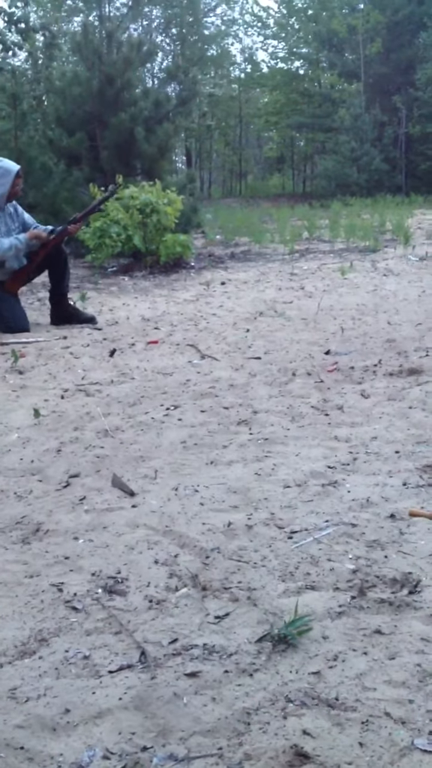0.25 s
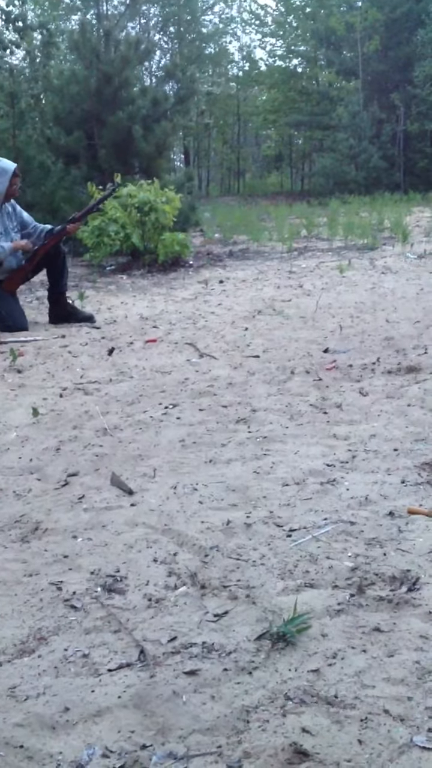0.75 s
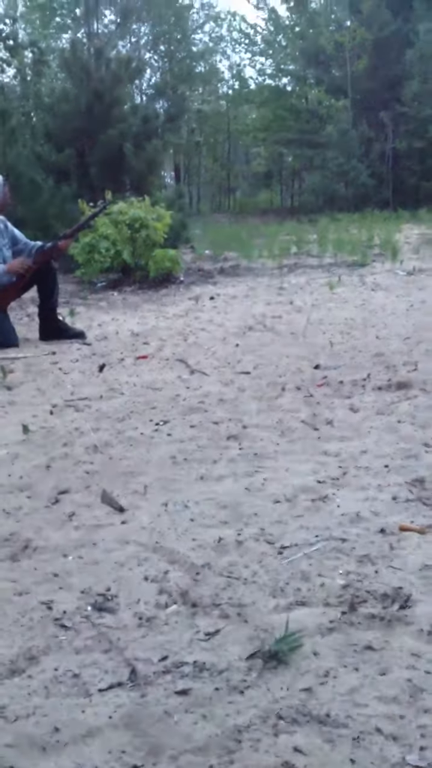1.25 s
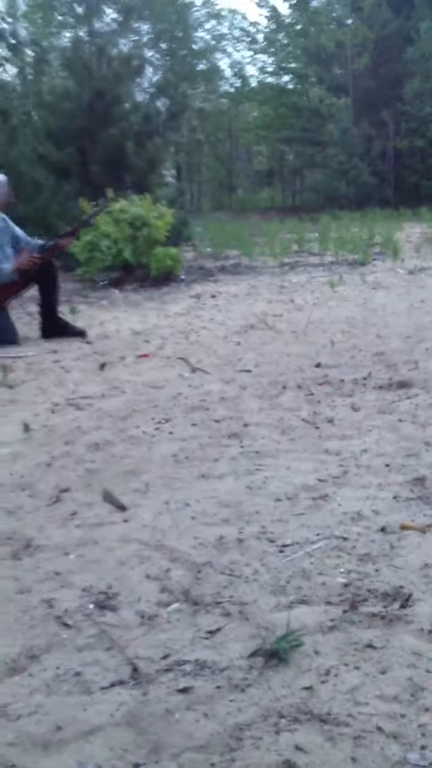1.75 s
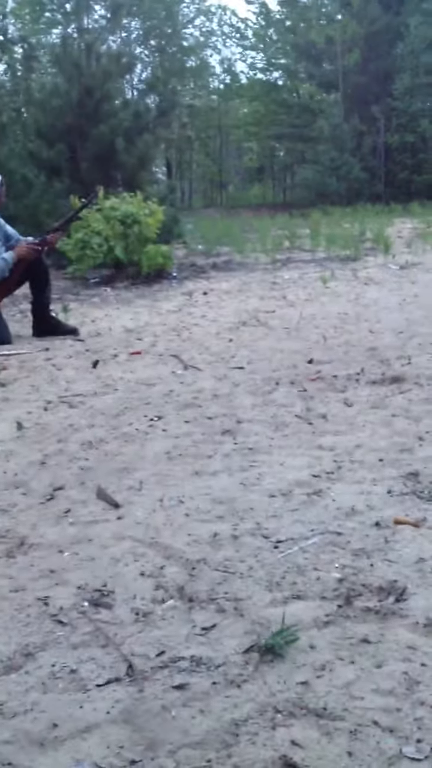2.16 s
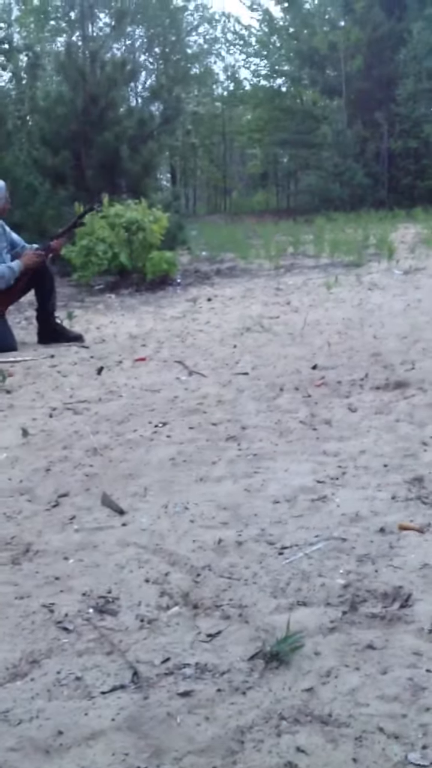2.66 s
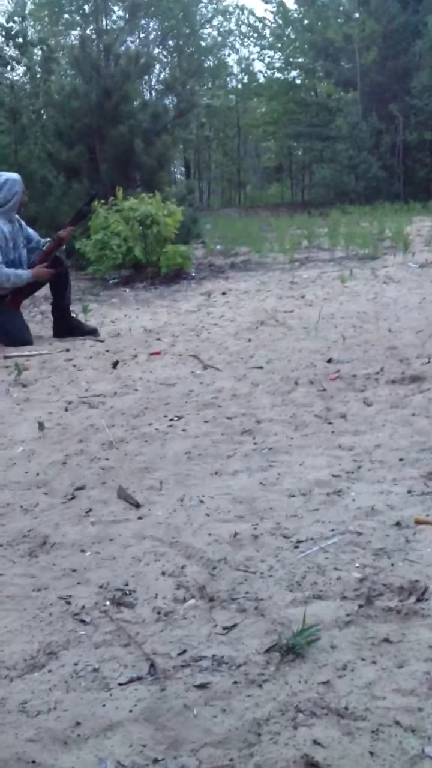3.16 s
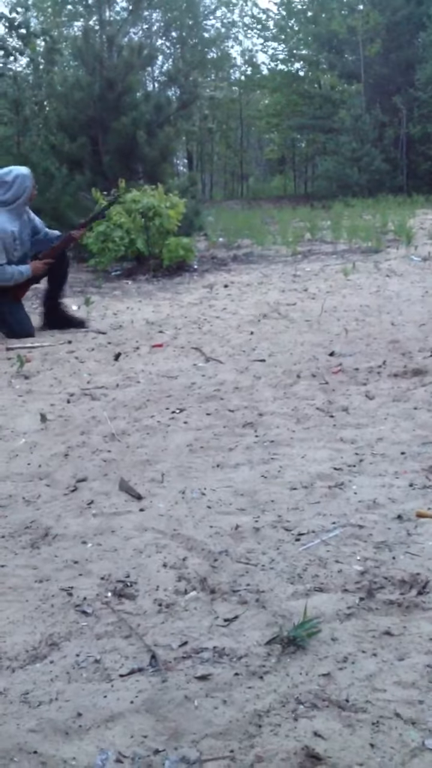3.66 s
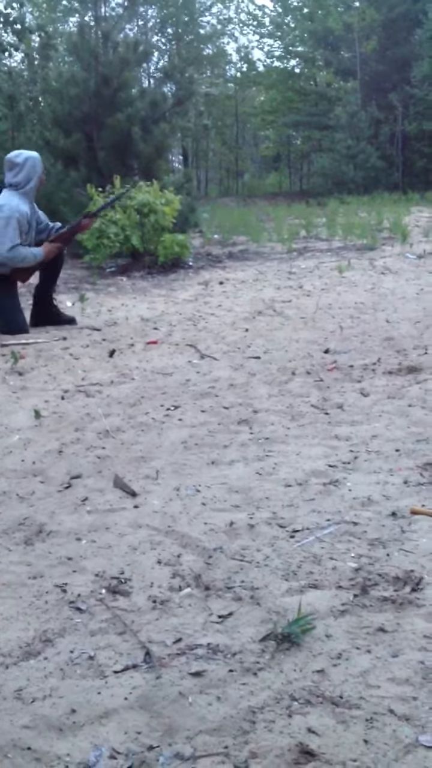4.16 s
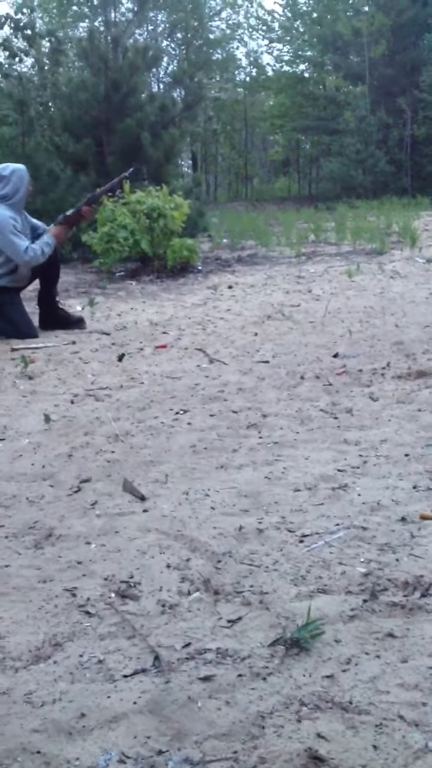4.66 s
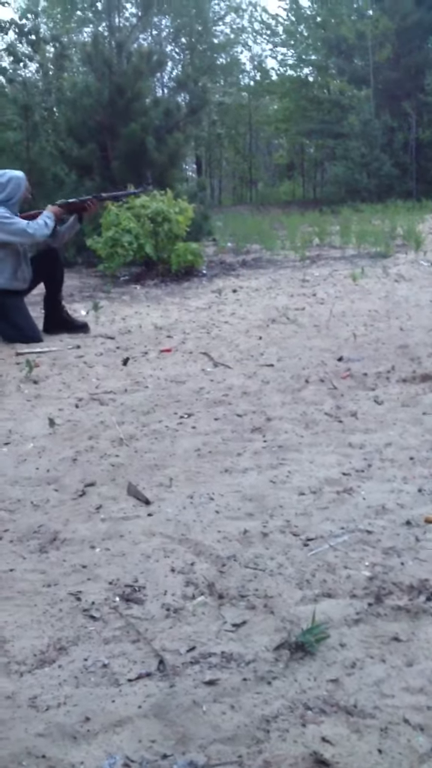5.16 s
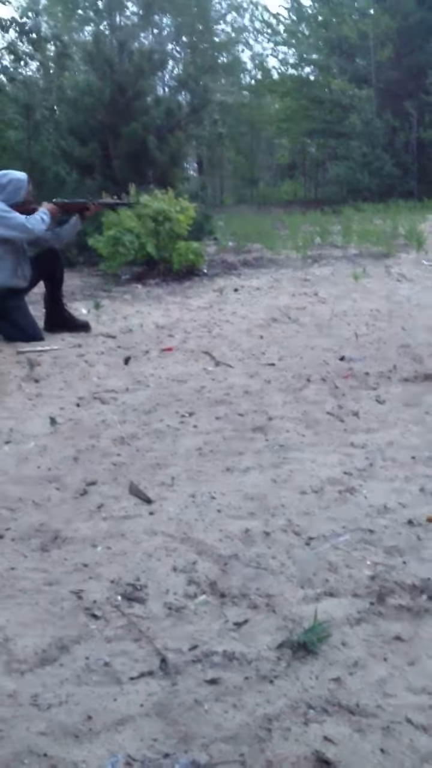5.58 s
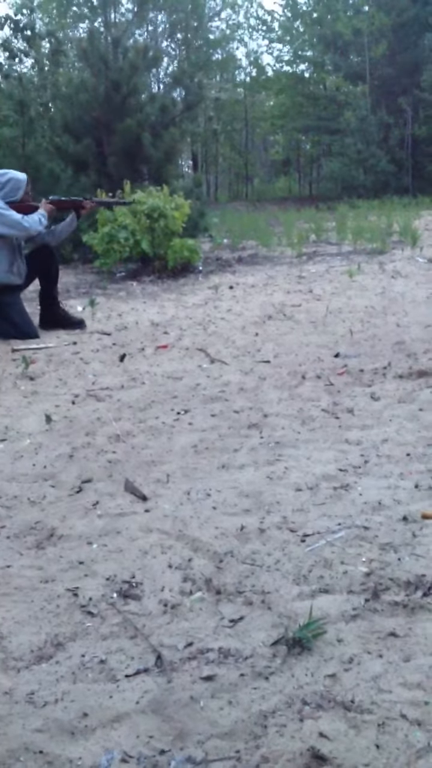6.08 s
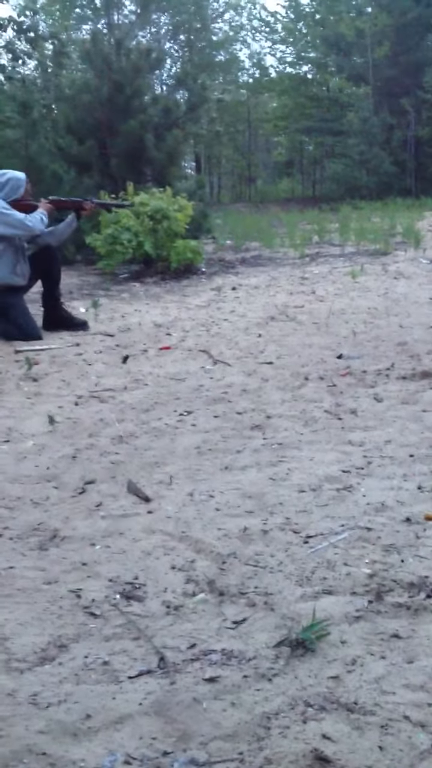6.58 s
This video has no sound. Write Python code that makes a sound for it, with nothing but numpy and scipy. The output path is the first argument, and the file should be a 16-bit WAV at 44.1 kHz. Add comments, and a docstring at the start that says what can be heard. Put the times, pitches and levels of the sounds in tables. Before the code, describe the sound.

A rifle bolt is worked close by in a sandy clearing: a quick clack, a short scrape and hard slam with a thin brass ring, then a forward slide and snap, then a firm locking click. Trees return a faint echo. Underneath, an earlier shot's rumble fades into a low drone while small birds chip and whistle.

```python
"""First a quick clack of steel: a rifle bolt is lifted, slid back and forth and locked in a sandy clearing.
The tree line answers every clack; under it an earlier shot rumbles away over a far drone, and two birds call.
The steel is made of bursts of tiny blows, rubbing noise and fading tones, shaped by the metal's resonances.
Rumble, air and cloth are coloured noise, the birds are gliding tones, and the echo is fading noise."""
import sys
import numpy as np
from scipy import signal
from scipy.fft import rfft, irfft, next_fast_len
from scipy.io import wavfile
from scipy.ndimage import uniform_filter1d, map_coordinates

SR = 44100
rng = np.random.default_rng(int(sys.argv[2]) if len(sys.argv) > 2 else 0)


def master(y):
    """Save y as 16-bit WAV."""
    cut = np.clip(np.atleast_2d(y).T, -1, 1)
    pcm = np.round(cut * 32767)  # scale
    wavfile.write(sys.argv[1], SR, pcm.astype(np.int16))


N = 301722  # length in samples


def amp(db):
    """Gain of a level in dB."""
    return 10 ** (np.asarray(db) / 20)


def unit(x):
    """x scaled to an rms (average strength) of 1."""
    return x / np.sqrt(np.mean(x ** 2) + 1e-20)


def along(points, hz):
    """Value at each pitch, read between (Hz, value) points on a log axis."""
    point_hz, values = np.transpose(points)
    return np.interp(np.log(hz + 1), np.log(point_hz + 1), values)


def wobble(rate, size=N):
    """A smooth random curve that takes a new random value `rate` times a second."""
    knots = rng.standard_normal(int(size * rate / SR) + 4)
    return map_coordinates(knots, [np.arange(size) * rate / SR])


def filtered(x, response):
    """x with each frequency multiplied by response(Hz)."""
    size = next_fast_len(len(x) + 8192)  # spare room lets the ringing die out
    spectrum = rfft(x, size) * response(np.fft.rfftfreq(size, 1 / SR))
    return irfft(spectrum, size)[:len(x)]


def noise(spectrum):
    """Coloured noise of rms 1."""
    return unit(filtered(rng.standard_normal(N), lambda hz: amp(along(spectrum, hz))))


def mode(f, hz, width):
    """Response of one resonance: 1 at its centre, weaker to both sides."""
    return 1j * f * width / (hz * hz - f * f + 1j * f * width)


def falling(first_db, quick_db, tau_s, slow_db_per_s):
    """Level over time: a quick fall that levels off, on a slow steady one."""
    t = np.arange(N) / SR
    return first_db - quick_db * (1 - np.exp(-t / tau_s)) - slow_db_per_s * t


# Colour of the far drone, leaves and hiss: pitch_hz [Hz], level_db [dB per Hz]
AIR_COLOUR = [(20, -36), (50, -31), (85, -23), (140, -3), (250, -8), (340, -12), (480, -13.5), (750, -9),
              (1100, -17.5), (2070, -22.5), (4500, -24), (8000, -27), (9800, -33), (11500, -27.5),
              (15300, -25.5)]


def air():
    """Steady noise of the open air, swaying a little in level."""
    return amp(-67 + .6 * wobble(4.9)) * noise(AIR_COLOUR)


# Colour of the deep part of the shot's echo: pitch_hz [Hz], level_db [dB per Hz]
RUMBLE_COLOUR = [(24, -76), (40, -43), (102, -28), (141, -12.5), (204, 1), (264, -4.5), (324, -13.5),
                 (400, -12.5), (520, -43), (880, -120)]
# Colour of the middle part of the shot's echo: pitch_hz [Hz], level_db [dB per Hz]
MIDDLE_COLOUR = [(250, -29), (400, -1), (700, -2.5), (1100, -6), (2000, -23.5), (4000, -35)]


def shot_echo():
    """An earlier shot returns in lumps from far woods, falling fast at first, then slowly."""
    rumble_db = falling(first_db=-51, quick_db=11, tau_s=0.94, slow_db_per_s=4)
    middle_db = falling(first_db=-58.5, quick_db=8.5, tau_s=0.87, slow_db_per_s=4)
    rumble = amp(rumble_db + 1.3 * wobble(13) + 1.1 * wobble(2.5)) * noise(RUMBLE_COLOUR)
    middle = amp(middle_db + 0.66 * wobble(12)) * noise(MIDDLE_COLOUR)
    return rumble + middle


# Fade of the echo: pitch_hz [Hz], t60_s [s to fall 60 dB, before it is stretched by `slower`]
TREE_FADE = [(500, 0.13), (2000, 0.7), (5000, 0.49), (9000, 0.65), (14000, 0.21)]


def trees(x, slower, block=8192):
    """Scattered echo that builds up once sound has reached the trunks, with a fade for each pitch."""
    out = np.zeros(N + SR)
    for start in range(0, N, block):  # fresh noise for each block, so echoes differ in fine grain
        hz, t, grid = signal.stft(rng.standard_normal(SR * 3 // 4), SR, nperseg=256)
        t60 = slower * along(TREE_FADE, hz)[:, None]
        tail = signal.istft(grid * amp(-60 * t / t60), SR, nperseg=256)[1]
        tail = tail * np.clip(np.arange(len(tail)) / SR / 0.019, .35, 1)  # build-up over 19 ms
        echo = signal.fftconvolve(x[start:start + block], tail / np.linalg.norm(tail))
        out[start:][:len(echo)] += echo[:N + SR - start]
    return out[:N]


# Cloth moving as the shooter shifts: peak_s [s], level_db [dB], half_length_s [s]
RUSTLES = [(3.74, -70, 0.063), (4.648, -78.5, .05), (5.05, -76, 0.28), (6.298, -82.5, .5)]
# Colour of the cloth: pitch_hz [Hz], level_db [dB per Hz]
CLOTH_COLOUR = [(500, -23), (900, 7.5), (1800, -2.5), (2800, -4), (5000, -12), (8000, -13.5)]


def rustle():
    """Soft clumped noise of cloth, swelling with each move."""
    t = np.arange(N) / SR
    moves = sum(amp(db) * np.exp(-((t - peak_s) / half_s) ** 2) for peak_s, db, half_s in RUSTLES)
    return moves * amp(2.2 * wobble(25)) * noise(CLOTH_COLOUR)


def slur(start_s, db, length_s, glide_hz):
    """One note that slurs up, levels off and warbles a little."""
    u = np.clip((np.arange(N) / SR - start_s) / length_s, 0, 1)  # 0 to 1 along the note
    hz = np.interp(np.sin(np.pi * u / 2), [0, 1], glide_hz) * (1 + .009 * wobble(70))
    swell = np.abs(np.sin(np.pi * u)) ** .5
    return swell * amp(db + 1.2 * wobble(35)) * np.sin(2 * np.pi * np.cumsum(hz) / SR)


# Whistles of a far bird: start_s [s], level_db [dB], length_s [s], pickup_db [dB, lower slur before it]
WHISTLE_CALLS = [(1.23, -82.5, 0.11, -96), (3.749, -75, 0.12, -83), (5.166, -75.5, .19, -82),
                 (6.028, -73, 0.16, -92)]
PICKUP_HZ, PICKUP_S = (2100, 2500), 0.15  # start and end pitch, length
GLIDE_HZ = (2920, 3363)  # start and end pitch of the main slur


def whistles():
    """Rising slurs; the middle two have a faint lower slur before them, the others none to be heard."""
    out = np.zeros(N)
    for start_s, db, length_s, pickup_db in WHISTLE_CALLS:
        out += slur(start_s - PICKUP_S, pickup_db, PICKUP_S, PICKUP_HZ)
        out += slur(start_s, db, length_s, GLIDE_HZ)
    return out


# Chip notes of a near bird: start_s [s], level_db [dB]
CHIP_NOTES = [(1.097, -73.5), (1.16, -73.5), (2.236, -69), (2.3, -74), (3.429, -77), (3.478, -74),
              (3.55, -70), (4.025, -75), (4.087, -73), (4.153, -72), (4.233, -78.5), (4.892, -73),
              (4.956, -71), (5.544, -73), (5.604, -70.5), (5.674, -73)]
CHIP_HZ, CHIP_S = 4680, .026  # starting pitch, length


def chips():
    """Short notes that hang for a moment, then drop in pitch."""
    out, t = np.zeros(N + SR), np.arange(2048) / SR
    swell = np.sin(np.pi * np.clip(t / CHIP_S, 0, 1))
    note = swell * np.sin(2 * np.pi * CHIP_HZ * (t - 0.65 * t ** 2 - 30 * t ** 3))
    for start_s, db in CHIP_NOTES:
        out[round(start_s * SR):][:len(t)] += amp(db) * note
    return out[:N] * amp(1.3 * wobble(110))


# Ringing of the empty case: pitch_hz [Hz], level_db [dB], t60_s [s to fall 60 dB]
CASE_TONES = [(13440, -20.5, 0.086), (13300, -33, 0.11), (9760, -39.5, .18)]
EJECT_S = .463  # moment it is flicked out


def case():
    """Thin brass rings on a few high tones; it tumbles, so the ring flutters."""
    t = np.maximum(np.arange(N) / SR - EJECT_S, 0)
    ring = np.zeros(N)
    for hz, db, t60 in CASE_TONES:
        ring += amp(db - 60 * t / t60 + 5 * wobble(120)) * np.sin(2 * np.pi * hz * t + .8 * wobble(81))
    return ring * (1 - np.exp(-t / 0.0026))  # soft start


# Short tones colouring the blows: pitch_hz [Hz], t60_s [s to fall 60 dB]
# Each key is only a label that tells the tones apart; it does not say which part sounds.
PING_TONES = {"stock": (300, 0.034), "grip": (481, 0.023), "receiver": (1010, 0.028),
              "handle": (1600, 0.026), "lugs": (2100, 0.0074), "swivel": (2530, 0.019),
              "spring": (4550, 0.02), "extractor": (6650, .02), "pin": (13300, 0.1), "sear": (2780, 0.016),
              "shroud": (7250, .008), "sleeve": (7900, 0.014)}
# When each tone sounds: start_s [s], level_db [dB, before the soft start and wobble], label [key above]
PING_TIMES = [(0.129, -36.5, "receiver"), (.441, -21.5, "extractor"), (.47, -28.5, "handle"),
              (1.884, -27, "receiver"), (2.585, -43, "handle"), (2.584, -43.5, "grip"),
              (2.843, -24, "spring"), (2.8565, -26, "lugs"), (2.856, -37, "grip"), (2.856, -25.5, "sear"),
              (2.857, -26.5, "shroud"), (2.858, -20, "sleeve"), (2.86, -30, "receiver"),
              (2.862, -51, "pin"), (2.911, -33.5, "receiver"), (3.038, -47, "lugs"),
              (5.352, -50.5, "swivel"), (5.537, -50.5, "stock"), (5.536, -53.5, "receiver")]


def pings():
    """Fading tones with a soft start; a random wobble of phase and level roughens each tone."""
    out, t = np.zeros(N + SR), np.arange(SR // 8) / SR
    for start_s, db, label in PING_TIMES:
        hz, t60 = PING_TONES[label]
        roughness = 2.6 * np.minimum(t / .03, 1) * wobble(160, size=len(t))
        ring = np.sin(2 * np.pi * hz * t + roughness) * amp(1.7 * roughness)
        fade = amp(db - 60 * t / t60) * (1 - np.exp(-t / .0015))
        out[round(start_s * SR):][:len(t)] += fade * ring
    return out[:N]


# Resonances of stock, bolt and receiver: pitch_hz [Hz], width_hz [Hz], level_db [dB, before extra gains]
STEEL_MODES = [(220, 200, -8), (504, 230, -6.5), (1037, 190, -2.5), (1730, 690, -3), (2588, 1000, -5),
               (3960, 1400, -6), (4555, 270, 0.5), (5460, 1600, -5.5), (6987, 1500, -2), (8430, 2000, -8),
               (9740, 900, -7), (11480, 1100, -4), (12570, 1300, -3.5), (13990, 1500, -8)]


def steel(gains_db):
    """Response of the resonances, each with an extra gain; signs alternate from one to the next."""
    def response(f):
        total = 0
        for k, ((hz, width, db), gain_db) in enumerate(zip(STEEL_MODES, gains_db)):
            total = total + (-1) ** k * amp(db + gain_db) * mode(f, hz, width)
        return total
    return response


def balance(thud_db, low_db, high_db):
    """Extra gain of each resonance from the thud, low and high share of a sound."""
    shares = [(600, thud_db), (900, low_db), (1900, low_db), (4000, 0), (7500, 0.0015), (10500, high_db)]
    return along(shares, np.array(STEEL_MODES)[:, 0])


# The bolt rubbing along its rails, ever faster:
# start_s [s], end_s [s], first_db [dB], last_db [dB], low_db [dB, low part], bend [power that bends the rise]
SLIDE_STROKES = [(0.35, 0.458, -75, -41.5, -1, 0.92), (1.715, 1.893, -76, -40.5, 2, 0.69)]
THINS_DB = -11  # change of the low part over a stroke
DULL_DB, BRIGHT_DB = -13, 0.5  # high part at the start and end of a stroke


def slides():
    """Noise in uneven grains rubs the steel, louder, thinner and brighter as the bolt speeds up."""
    out, t = np.zeros(N), np.arange(N) / SR
    grit = amp(3 * wobble(600) + 1.3 * wobble(120)) * rng.standard_normal(N)  # fine grains and lumps
    rubbed = filtered(grit, steel(balance(thud_db=-29, low_db=2, high_db=0.92)))

    def band(from_hz, to_hz):
        """One frequency band of the rubbing, at rms 1."""
        return unit(filtered(rubbed, lambda f: (from_hz <= f) & (f < to_hz)))

    low, middle, high = band(0, 2500), band(2500, 8000), band(8000, SR)
    for start_s, end_s, first_db, last_db, low_db, bend in SLIDE_STROKES:
        u = np.clip((t - start_s) / (end_s - start_s), 0, 1)  # 0 to 1 along the stroke
        high_db = DULL_DB + (BRIGHT_DB - DULL_DB) * u
        grain = amp(low_db + THINS_DB * u) * low + middle + amp(high_db) * high
        edges = np.clip(np.minimum(t - start_s, end_s - t) / .006, 0, 1)  # 6 ms fades
        out += edges * amp(first_db + (last_db - first_db) * u ** bend) * grain
    return out


# Contacts of the bolt:
# start_s [s], peak_db [dB], low_db [dB, low part], high_db [dB, high part], chatter_ms [ms]
BOLT_CONTACTS = [(0.06, -38, 8, -13, 4.2), (0.126, -32, 2.5, -3.5, 2), (0.128, -16.5, -7, 0, 4.4),
                 (0.365, -49, 10.5, -12, 3), (0.408, -32.5, 2.5, 0, 4), (0.426, -31, -17, -13, 4.6),
                 (0.439, -24, -2, -1, 5), (0.456, -18, -13, 3, 6), (0.461, -15, -5, 0, 6),
                 (0.468, -9.5, -6.5, 0.5, 2.5), (0.479, -22, -3, 4.5, 6), (0.957, -48.5, -6, 11.5, 3),
                 (1.741, -51, -5, -11, 3), (1.777, -46, -4, 18.5, 2), (1.818, -44, -1, 10, 2.5),
                 (1.828, -33.5, -1, 5, 5.1), (1.839, -26.5, -12, 5, 4.6), (1.856, -25.5, -11, -4, 3.5),
                 (1.868, -24, 1.5, 2.5, 4), (1.882, -11, -5, 0, 3.9), (2.576, -45, 4, -6, 6.4),
                 (2.584, -27.5, 1, -2, 3), (2.737, -54, -4, 5, 2.5), (2.837, -37, 5, -2, 3.6),
                 (2.843, -20.5, -6, 3, 1.9), (2.856, -13, 2, -3.5, 2.6), (2.911, -37, -1, 3.5, 4.9),
                 (3.04, -58, 10, -18, 3), (3.148, -46.5, 21, -16, 3), (3.216, -54, -1, 2, 3),
                 (4.646, -55, 6.5, -13, 2.4), (4.823, -43.5, -1.5, -5, 2.5), (5.455, -57.5, 8.5, -14.5, 3),
                 (5.536, -49, 5.5, -16, 2.2), (5.91, -63, 0, -15, 3)]
HARD_DB = -14  # blows above this peak rebound and ring the barrel
BARREL_HZ, BARREL_WIDTH_HZ = 4540, 600
BARREL_T60, BARREL_DB = 0.78, -45  # seconds to fall 60 dB, level against the blow


def barrel():
    """A narrow band of noise stands for many blurred modes; every hard blow tops up its energy."""
    t, energy = np.arange(N) / SR, np.zeros(N)
    for start_s, db, *_ in BOLT_CONTACTS:
        if db > HARD_DB:
            fade_db = -60 * np.abs(t - start_s) / BARREL_T60
            energy += (t > start_s) * amp(db + BARREL_DB + fade_db) ** 2
    blur = filtered(rng.standard_normal(N), lambda f: mode(f, BARREL_HZ, BARREL_WIDTH_HZ) ** 2)
    return np.sqrt(energy) * unit(blur)


THUD_DB = -11  # share of the stock in every contact
CREST_DB = 9.5  # peak of a chatter over its rms
REBOUND_S, REBOUND_DB = .0028, -5  # delay and level of the one bounce


def contacts():
    """Each contact is a short chatter of tiny blows that rings the steel; hard blows bounce once.
    Returns the direct sound and the sound sent to all sides, where the fine peaks average out."""
    near, around, t = np.zeros(N + SR), np.zeros(N + SR), np.arange(4096) / SR
    rebounds = [(s + REBOUND_S, db + REBOUND_DB, *rest) for s, db, *rest in BOLT_CONTACTS if db > HARD_DB]
    for start_s, db, low_db, high_db, chatter_ms in BOLT_CONTACTS + rebounds:
        start = round(start_s * SR)
        gains_db = balance(THUD_DB, low_db, high_db)
        force = (1 - np.exp(-t / .0004)) * np.exp(-(1000 * t / chatter_ms) ** 1.5)
        blows = rng.standard_normal(len(t)) * amp(3.4 * rng.standard_normal(len(t)))  # a few stand out
        uneven_db = rng.normal(0, 1, len(STEEL_MODES))  # no two contacts ring quite alike
        clack = filtered(force * blows, steel(gains_db + uneven_db))
        loudest = np.sqrt(uniform_filter1d(clack ** 2, size=64).max())
        clack = amp(db - CREST_DB) * clack / loudest
        near[start:][:len(t)] += clack
        single_click = 1. * (t == 0)
        around[start:][:len(t)] += unit(filtered(single_click, steel(gains_db))) * clack.std()
    return near[:N], around[:N]


def scene():
    """The rifle is near; the birds sit in the wood, where echoes are strong and long."""
    near, around = contacts()
    ringing, tones = slides() + barrel() + case(), pings()
    far_bird, near_bird = whistles(), chips()
    echo = trees(around + ringing + amp(-5) * tones, slower=0.9)
    clearing = near + ringing + tones + amp(-15) * echo
    # the microphone thins the deep bass of the rifle and its echo
    clearing = filtered(clearing, lambda hz: (1j * hz / (1j * hz + 170)) ** 2)
    birds = far_bird + near_bird + trees(far_bird + amp(-3.5) * near_bird, slower=3.1)
    return (clearing + birds + rustle() + shot_echo() + air())[None]


def record(dry):
    """Keep only what lies below the band limit of 15350 Hz."""
    return filtered(dry[0], lambda hz: hz < 15350)[None]


dry = scene()
out = record(dry)
master(out)
```